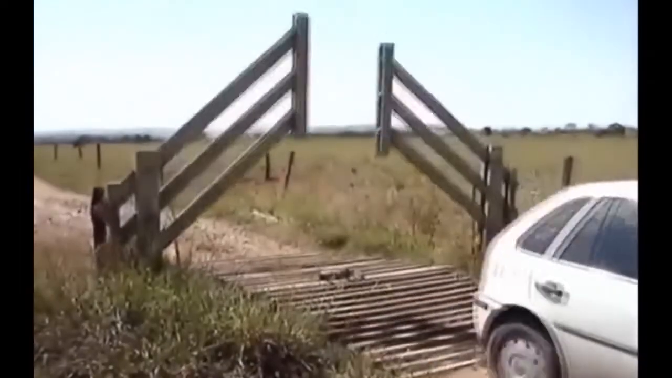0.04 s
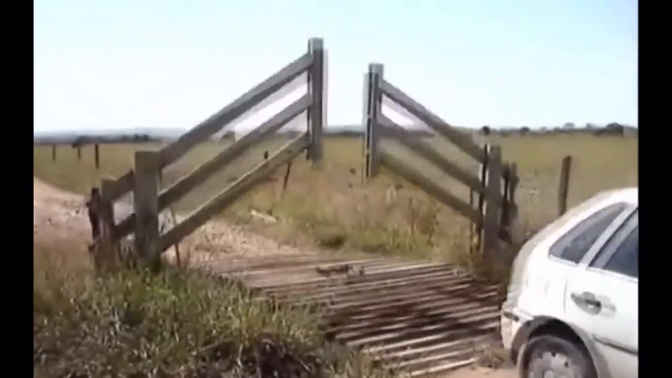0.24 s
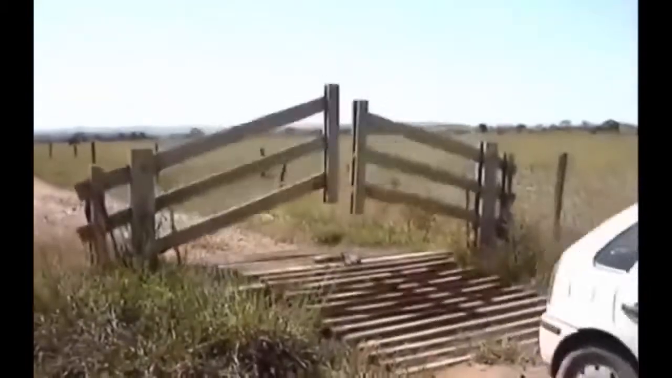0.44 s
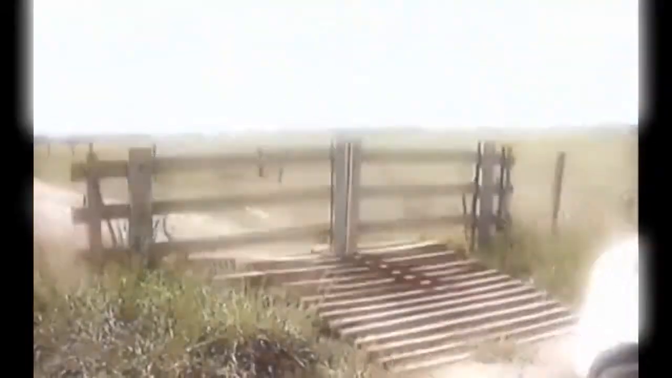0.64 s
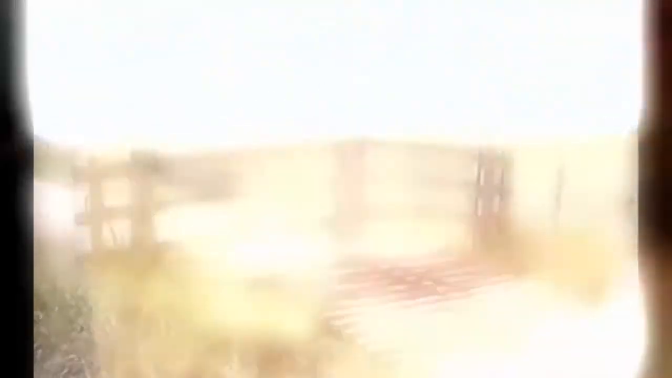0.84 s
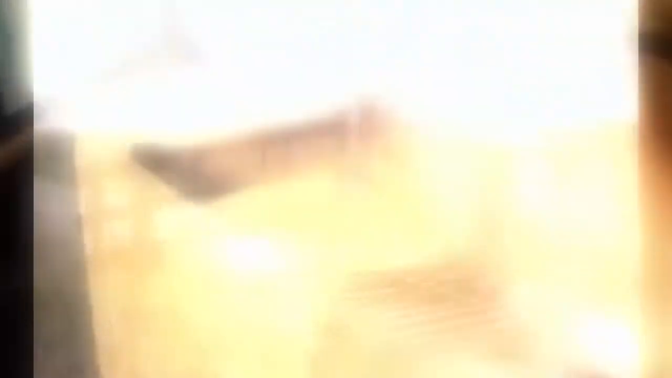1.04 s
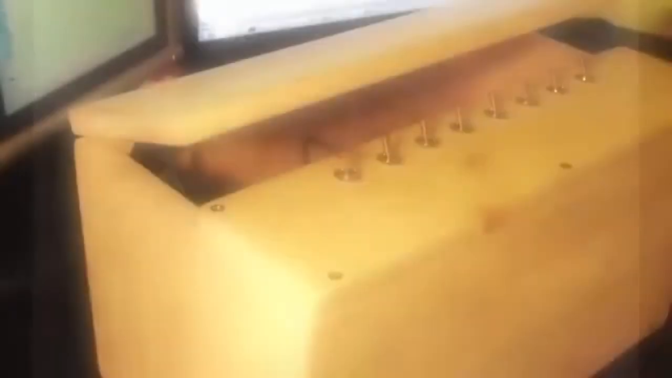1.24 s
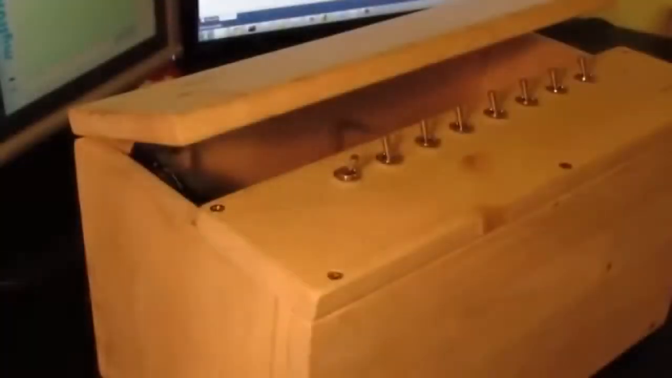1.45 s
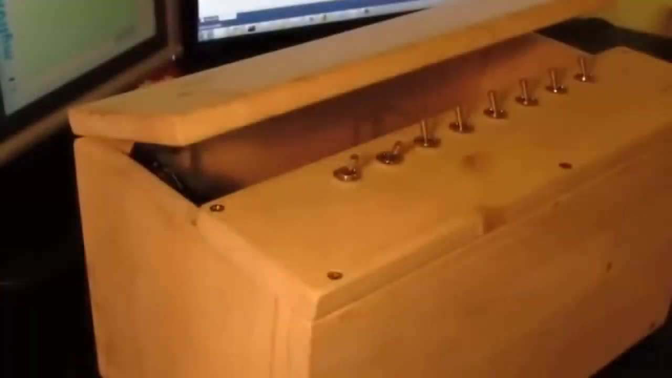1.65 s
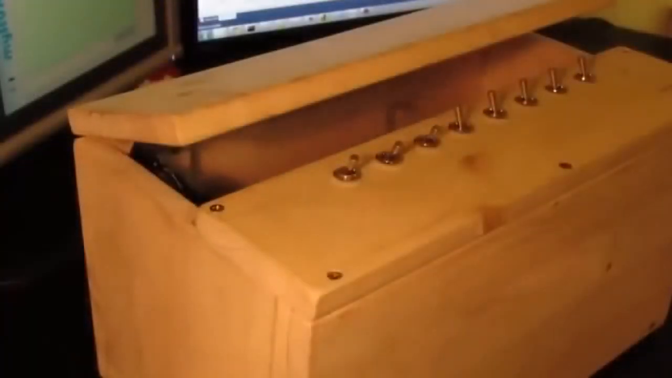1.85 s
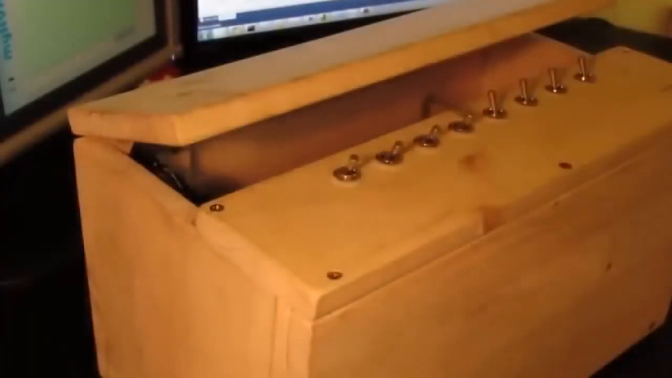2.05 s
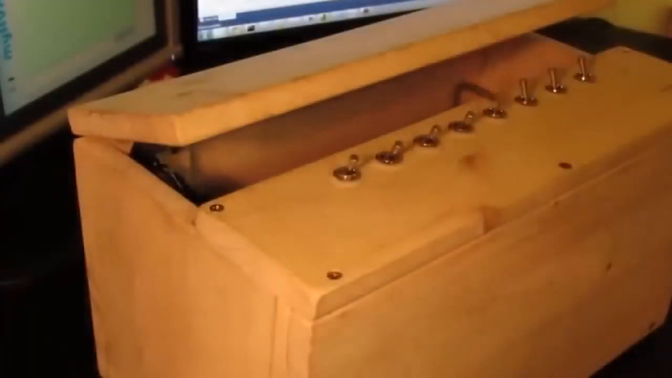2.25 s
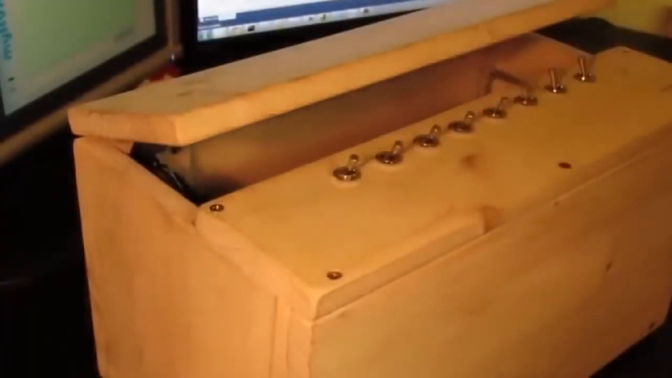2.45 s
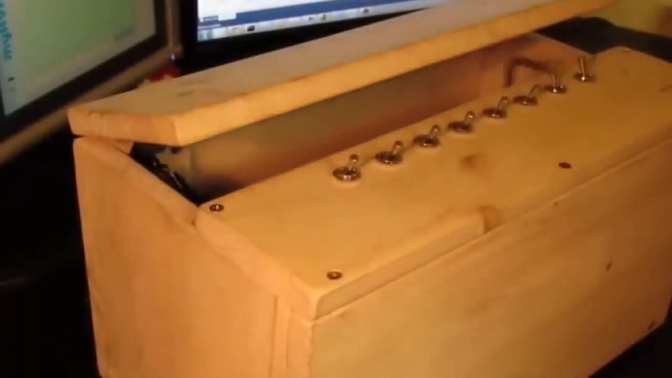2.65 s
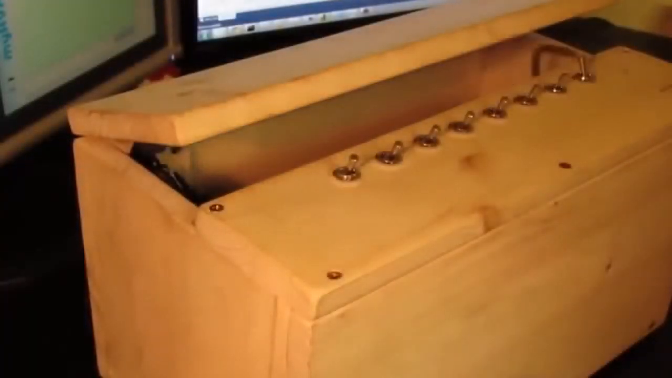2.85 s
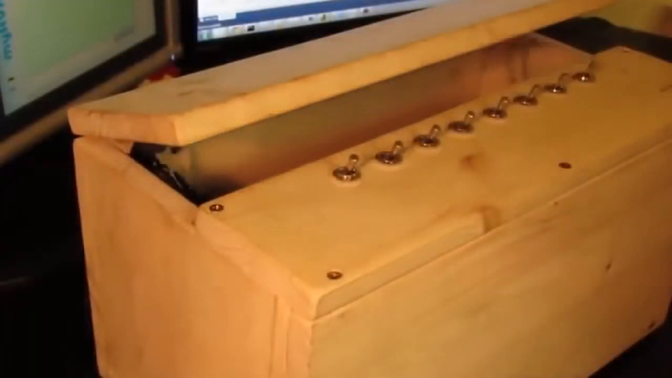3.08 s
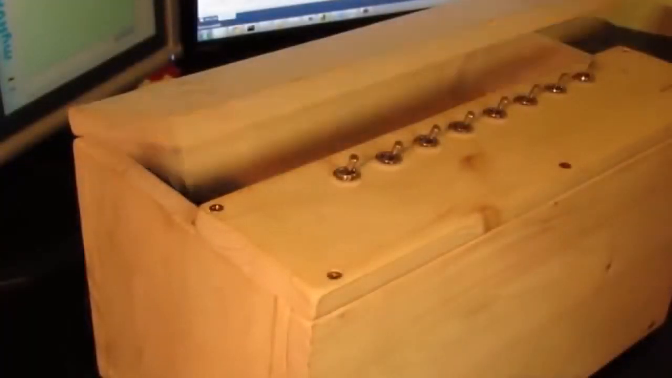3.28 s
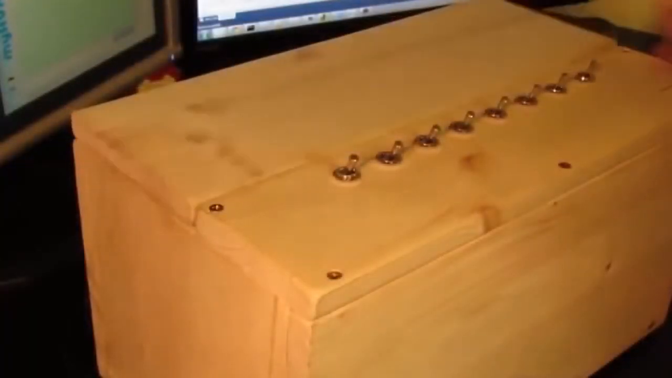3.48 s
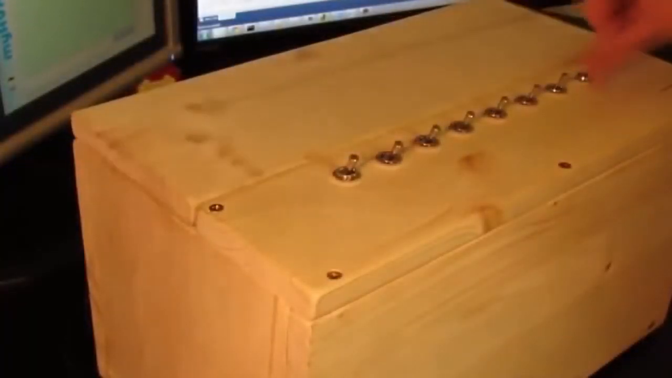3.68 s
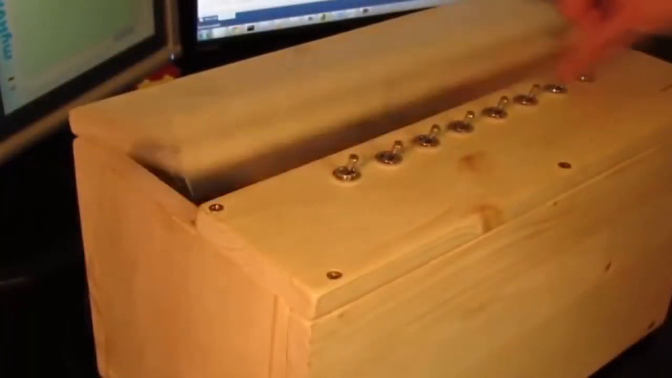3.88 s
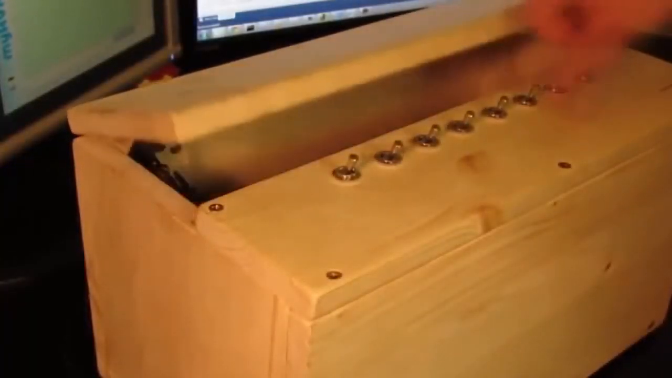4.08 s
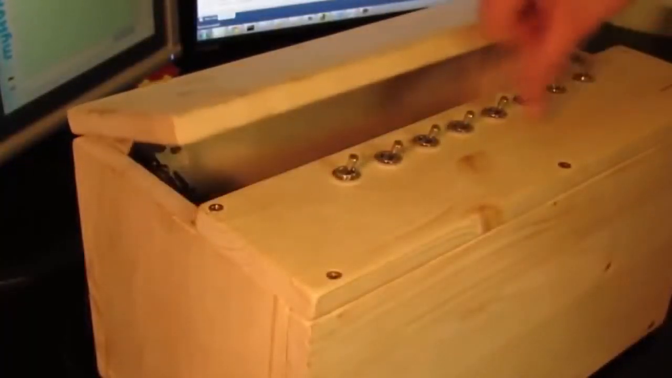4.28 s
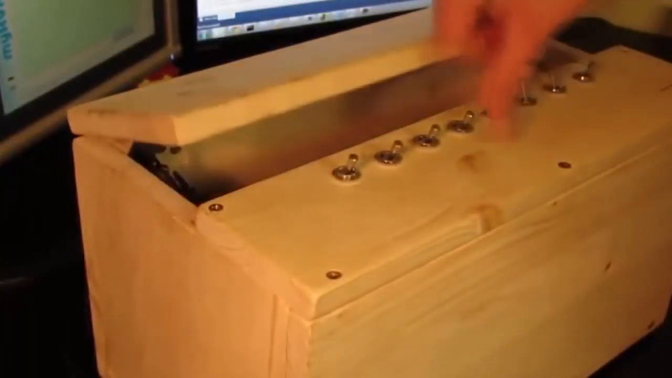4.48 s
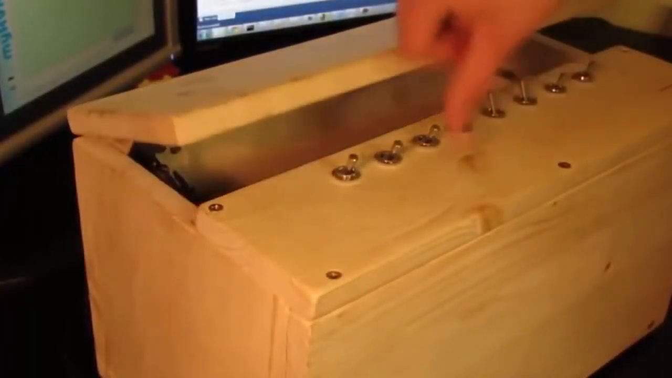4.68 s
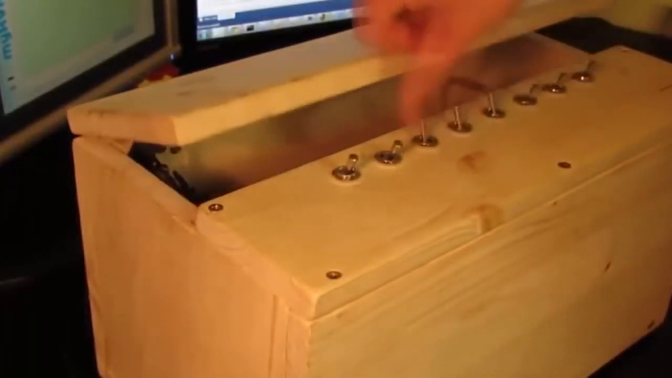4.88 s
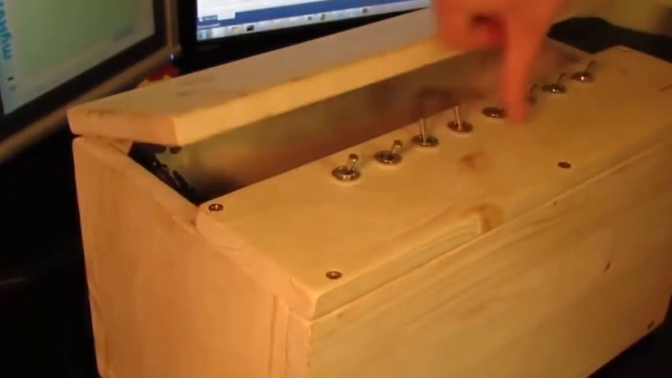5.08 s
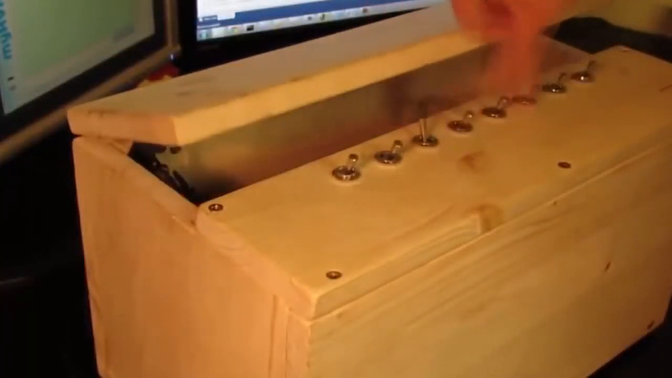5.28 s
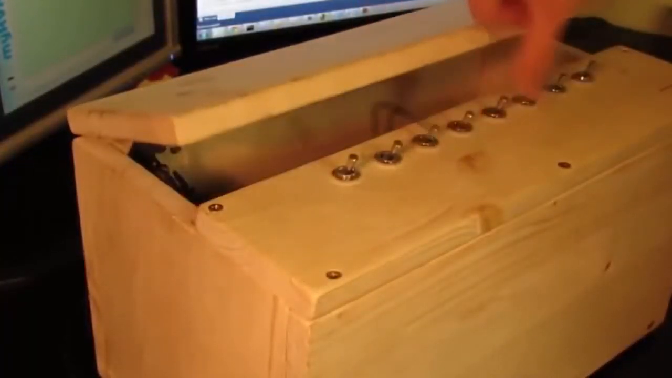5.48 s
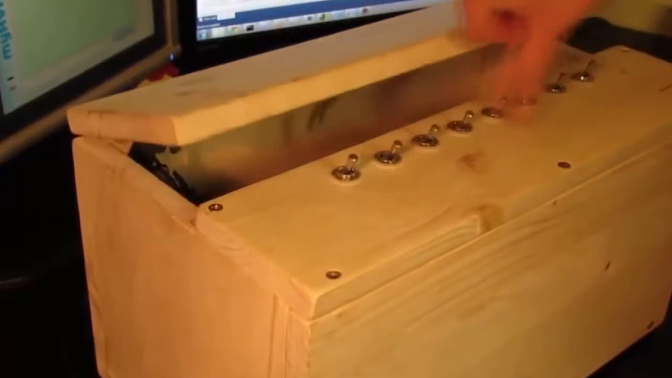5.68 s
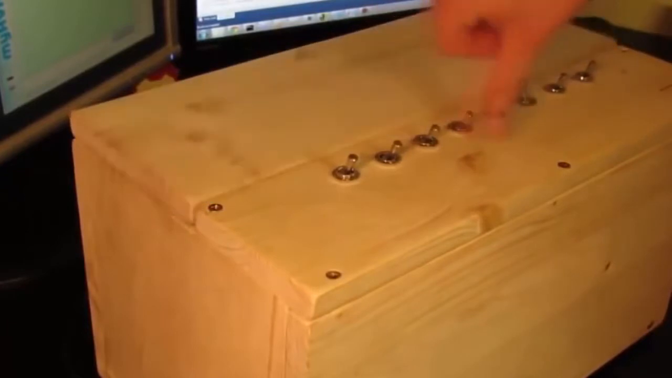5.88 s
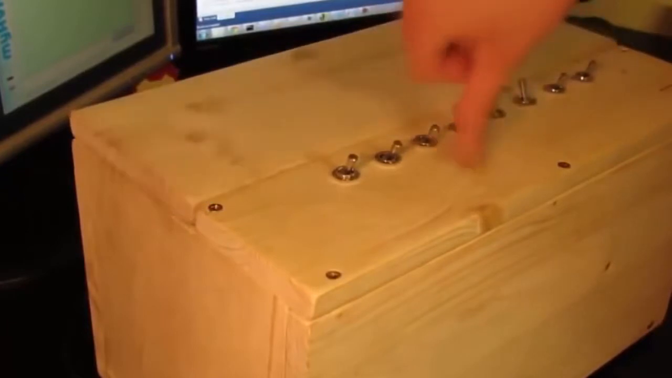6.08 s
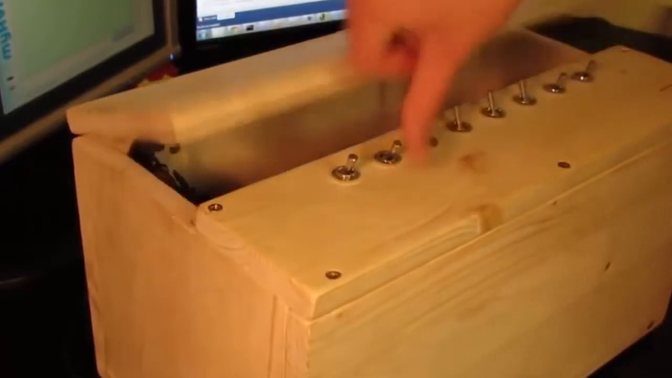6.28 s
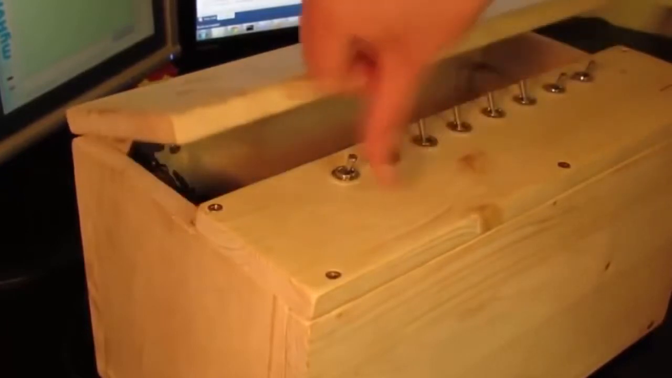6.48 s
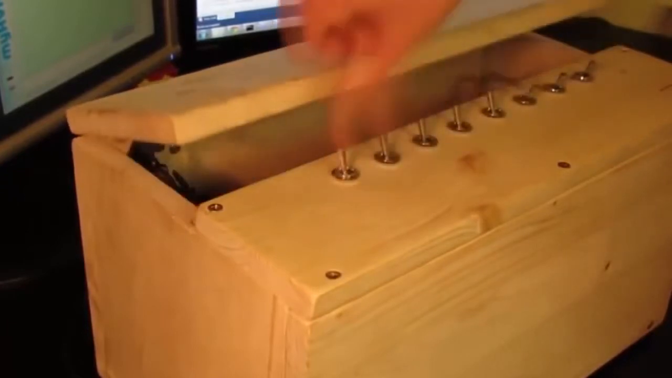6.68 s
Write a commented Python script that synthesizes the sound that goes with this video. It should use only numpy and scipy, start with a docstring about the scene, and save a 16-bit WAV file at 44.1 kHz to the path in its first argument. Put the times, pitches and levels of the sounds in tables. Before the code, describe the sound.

Close up in a small quiet room, toggle switches on a wooden box snap brightly, each ringing the panel. Eight regular snaps come over a gritty motor whir with light rattling and soft arm taps between them. The lid slams with a woody boom; after a short pause the motor restarts and clicks crowd together irregularly. Another lid slam interrupts, then snapping and whirring resume until the end.

```python
"""Metal toggles snap one after another in a small room, each ringing the wooden box they sit in on a desk.
A finger flips them on; a motor-driven arm travels inside the box, whirring and ticking, and flips them back.
Twice the lid claps shut and the box thuds. Springs, wood and box are noise and blows rung through resonances;
motor, gears and rolling carriage are swelling coloured noise. Walls, a near surface and quiet air surround it,
in stereo."""
import sys
import numpy as np
from scipy import signal
from scipy.fft import rfft, irfft, next_fast_len
from scipy.io import wavfile
from scipy.ndimage import map_coordinates

SR = 44100
rng = np.random.default_rng(int(sys.argv[2]) if len(sys.argv) > 2 else 0)


def inscribe(sig):
    """Save sig as 16-bit PCM at rate SR to the path in sys.argv[1].

    A 1-D sig is mono; a 2-D sig holds one channel per row.
    Samples are clipped to [-1, 1] before scaling.
    """
    pcm = np.round(np.clip(np.atleast_2d(sig).T, -1, 1) * 32767)
    wavfile.write(sys.argv[1], SR, pcm.astype(np.int16))


N = 296793  # samples


def amp(db):
    """Decibels to gain."""
    return 10 ** (np.asarray(db) / 20)


def unit(x):
    """Scaled to rms 1."""
    return x / np.sqrt(np.mean(x ** 2) + 1e-20)


def along(points, hz):
    """(Hz, value) points read on a log axis."""
    f, v = np.transpose(points)
    return np.interp(np.log(hz + 1), np.log(f + 1), v)


def filtered(x, response):
    """x times a complex response of frequency, padded so that ringing does not wrap round."""
    n = x.shape[-1]
    padded = next_fast_len(n + 8192)
    return irfft(rfft(x, padded) * response(np.fft.rfftfreq(padded, 1 / SR)), padded)[..., :n]


def resonances(modes, f):
    """Causal response of (Hz, width, dB) modes, alternating in sign."""
    total = 0
    for k, (centre, width, db) in enumerate(modes):
        total = total + (-1) ** k * amp(db) * 1j * f * width / (centre * centre - f * f + 1j * f * width)
    return total


def pair(n, side):
    """Stereo white noise with a given side share."""
    mid, wide = rng.standard_normal((2, n))
    return np.array([mid + side * wide, mid - side * wide])


def rush(spectrum, side):
    """Coloured stereo noise of rms 1."""
    return unit(filtered(pair(N, side), lambda f: amp(along(spectrum, f))))


def wobble(rate):
    """A smooth random curve, rate knots a second."""
    knots = rng.standard_normal(int(N * rate / SR) + 4)
    return map_coordinates(knots, [np.arange(N) * rate / SR])


def add(track, s, sound):
    """Mix a sound into the track at time s."""
    part = track[:, max(round(s * SR), 0):]
    part[:, :sound.shape[-1]] += sound[..., :part.shape[-1]]


def spells(rows, rise_s, fall_s):
    """Gain over time of (start, end, dB) spells: a rise, a hold and an exponential fall."""
    t = np.arange(N) / SR
    gains = []
    for start, end, db in rows:
        rise = np.clip((t - start) / rise_s, 0, 1)
        fall = np.exp(-np.clip((t - end) / fall_s, 0, 20))
        gains.append(amp(db) * rise * fall)
    return np.max(gains, axis=0)


# Quiet air of the room, its colour only. Each row: frequency in Hz, relative level in dB.
AIR = [(15, -39.5), (25, -33), (139, -3), (231, -12.5), (373, -23.5), (450, -18), (903, -25), (1090, -18.5),
       (1960, -24), (8320, -47), (15000, -65)]


def air():
    """Steady broadband noise, strongest in the low mids, fills the room."""
    return amp(-54.5) * rush(AIR, side=0.51)


# Reflection from a surface close by. Each row: frequency in Hz, gain in dB.
NEAR_WALL = [(300, -23), (1000, -11.5), (2500, -32), (9000, -23)]
NEAR_DELAY_S = .0075


def near_surface(hits):
    """One late, weaker copy of the hits, strongest around 1 kHz."""
    return filtered(hits, lambda f: amp(along(NEAR_WALL, f)) * np.exp(-2j * np.pi * f * NEAR_DELAY_S))


# How long the room rings. Each row: frequency in Hz, time to fall 60 dB in seconds.
ROOM = [(100, 0.29), (260, 0.35), (700, 0.32), (2000, 0.26), (5000, 0.27), (13000, 0.21)]
# How wide the room sounds. Each row: frequency in Hz, side share of the stereo.
SPREAD = [(130, 0.1), (400, 0.38), (2000, 0.78), (12000, 0.98)]


def room(x):
    """Diffuse answer of the walls, wider in the treble; the noise tail is redrawn every third of a second."""
    out, hop = np.zeros((2, N)), SR // 3
    for start in range(0, N, hop):
        hz, t, z = signal.stft(rng.standard_normal((2, SR // 2)), SR, nperseg=256)
        z = z * amp(-60 * t / along(ROOM, hz)[:, None]) * (1 - np.exp(-t / 0.0026))
        spread = np.array([z[0], z[1] * along(SPREAD, hz)[:, None]])
        tail = signal.istft(spread, SR, nperseg=256)[1]
        mid, side = tail / np.linalg.norm(tail[0])
        source = x.mean(0)[None, start:start + hop]
        add(out, start / SR, signal.fftconvolve(source, [mid + side, mid - side], axes=1))
    return out


# Spells in which the box rocks: lurches of the carriage, and the box swaying after the heavy thuds. Each row:
# start in seconds, end in seconds, rumble in relative dB.
RUMBLES = [(1.05, 1.17, -38.5), (2.52, 2.80, -47.5), (3.42, 3.48, -38), (3.56, 3.63, -46),
           (3.88, 3.95, -43), (4.10, 4.24, -37), (5.93, 6.00, -36.5), (6.04, 6.09, -44), (6.19, 6.24, -47),
           (6.40, 6.48, -38)]
RUMBLE_RISE_S, SETTLE_S = 0.025, 0.055  # rise time and dying time constant
ROLL_DB = -13  # rumble of the rolling carriage, relative to the motor gain
IDLE_DB = -61.5  # steady rumble of the box, added to the rolling


def carriage(motor_gain):
    """The moving carriage or a heavy thud rocks the box at its lowest resonance and bumps the hollow above it."""
    t = np.arange(N) / SR
    rolling = amp(ROLL_DB) * motor_gain + amp(IDLE_DB)
    rocking = np.maximum(spells(RUMBLES, RUMBLE_RISE_S, SETTLE_S), rolling)
    sway = np.sqrt(2) * np.sin(2 * np.pi * 64.5 * t + 2.0 * wobble(14))

    def low_box(f):
        return resonances([(61.0, 20, 0)], f) * resonances([(66, 300, 0)], f)

    def hollow(f):
        return resonances([(144.0, 29, -2.5), (222, 28, -6.5), (322, 99, -8.5)], f) / (1 + (f / 500) ** 4)

    rumble = unit(filtered(pair(N, side=0.24), low_box))
    bumps = unit(filtered(pair(N, side=0.14) * amp(2.3 * wobble(45)), hollow))
    return rocking * (0.68 * sway + .5 * rumble + 0.36 * bumps) * amp([[.9], [-.9]])  # leans left


# Runs of the drive: lifting the lid, working along the row, withdrawing, racing to the far end, chasing
# the finger. Each row: start in seconds, end in seconds, motor in relative dB, gear hiss in relative dB.
RUNS = [(0.957, 1.406, -58.5, -50), (1.406, 3.118, -47.5, -42.5), (3.13, 3.467, -60.5, -44),
        (3.845, 3.92, -48, -54), (4.003, 4.287, -45.5, -42), (4.383, 5.653, -50.5, -49.5),
        (5.65, 5.856, -66, -48.5), (6, 6.22, -55, -52), (6.347, 6.509, -44.5, -40.5)]
SPIN_UP_S, RUN_DOWN_S = 0.019, 0.038  # rise time and dying time constant
# The motor eases off as the arm meets a toggle: depth, delay after the touch, half width.
EASE_DB, EASE_LAG_S, EASE_S = 1.5, 0.059, 0.023


def effort():
    """Gains of motor and gears as the drive starts and stops; the motor also eases off at each toggle."""
    t = np.arange(N) / SR
    easing = sum(np.exp(-((t - s - EASE_LAG_S) / EASE_S) ** 2) for s, *_ in STROKES)
    motor = spells([(start, end, db) for start, end, db, _ in RUNS], SPIN_UP_S, RUN_DOWN_S)
    gears = spells([(start, end, db) for start, end, _, db in RUNS], SPIN_UP_S, RUN_DOWN_S)
    return motor * amp(-EASE_DB * easing), gears


# Low resonances of the hollow box. Each row: frequency in Hz, width in Hz, relative level in dB.
HOLLOW = [(151.2, 4.1, 3), (177, 11, -4.5), (229, 31, -2.5), (397, 35, -9.5)]
# Colour of the motor's whir. Each row: frequency in Hz, relative level in dB.
WHIR = [(59, -32), (100, -13), (129, -7.5), (242, -2.5), (312, -15.5), (386, -3), (472, -4.5), (713, -12),
        (799, -9), (975, -5.5), (1110, -8), (1880, -10.5), (2040, -42), (2260, -18), (3000, -15.5),
        (3900, -26), (6600, -120)]
# Colour of the gear hiss. Each row: frequency in Hz, relative level in dB.
GEARS = [(1180, -37.5), (2000, -2.5), (2460, -2), (3100, -7), (6580, -5.5), (9930, -17.5), (10900, -14.5),
         (13500, -28.5), (14200, -28.5), (15500, -67)]
# Ringing gear parts. Each row: frequency in Hz, width in Hz, relative level in dB.
WHINE = [(2950, 380, 0.5), (4860, 90, 4), (6280, 60, -9), (6950, 54, 2), (7800, 60, -2.5), (8960, 60, -1),
         (10600, 71, -3.5)]
SCRAPE_DB, SCRAPE_PER_S = 2, 70  # unevenness of the gear sound: depth and knots a second


def drive(motor_gain, gear_gain):
    """The motor whirs in the hollow box; the gears hiss and sing; whir and gears swell once a turn."""
    t = np.arange(N) / SR
    hollow = unit(filtered(pair(N, side=0.096), lambda f: resonances(HOLLOW, f)))
    turn = np.sin(2 * np.pi * 22 * t + wobble(10.0))  # about 22 turns a second
    whir = amp(-1.0 + 3.9 * turn + 0.9 * wobble(91)) * rush(WHIR, side=0.46)
    motor = whir + amp(-2.0) * hollow
    whine = unit(filtered(pair(N, side=0.26), lambda f: resonances(WHINE, f)))
    swell = amp(-12.0 + 2.1 * turn + SCRAPE_DB * wobble(SCRAPE_PER_S))
    gears = swell * (rush(GEARS, side=0.62) + 0.61 * whine)
    return motor_gain * motor + gear_gain * gears


# The wooden switch panel. Each row: frequency in Hz, width in Hz, relative level in dB.
PANEL = [(195, 87, -2), (437.5, 82, 2), (639.4, 62, 1.5), (933, 267, -3), (1030, 113, 2), (1264, 59, -4),
         (1410, 67, -7.5), (1705, 49, -14), (1839, 64, -3.5), (1903, 336, -1.5), (2120, 160, 0),
         (2430, 213, -4), (2822, 300, 2), (2990, 300, -5.5), (3250, 650, -15.5), (4120, 1800, 3),
         (6500, 2310, 10), (6560, 45, -18), (8170, 670, 1), (11100, 7100, -5.5)]


def rattle(motor_gain):
    """Loose linkage taps the wood dully at random, harder while the motor works."""
    t = np.arange(SR // 100) / SR
    taps = (rng.random(N) < 55 / SR) * amp(12 * rng.uniform(-1.4, 1, N))  # about 55 a second
    tap = pair(SR // 100, side=0.71) * np.exp(-t / 0.0013)
    excite = signal.fftconvolve(taps[None], tap, axes=1)[:, :N]
    wood = unit(filtered(excite, lambda f: resonances(PANEL, f) / (1 + (f / 3200) ** 4)))
    return amp(-4.0) * motor_gain * wood


def spot(modes, scatter_db):
    """Each place on a board favours other modes."""
    return [(hz, width, db + scatter_db * rng.standard_normal()) for hz, width, db in modes]


# Bands of a contact, low to treble. Each row: low edge in Hz, high edge in Hz, chatter rise in seconds and
# chatter time to fall 60 dB in seconds (both at length 1), side share of the stereo.
BANDS = [(173, 620, 0.00065, 0.1, 0.4), (814, 1634, 0.0035, 0.044, 0.36), (1710, 3320, 0.0007, 0.066, 0.39),
         (3650, 16700, 0.000096, 0.052, 0.6)]
GRID = np.fft.rfftfreq(8192, 1 / SR)  # Hz
OCTAVES = np.log2([np.sqrt(lo * hi) / 2000 for lo, hi, *_ in BANDS])  # band centres from 2 kHz


def band_edges(lo, hi):
    """Complex response of one band on the frequency grid."""
    sos = signal.butter(3, [lo, hi], "band", fs=SR, output="sos")
    return signal.sosfreqz(sos, GRID, fs=SR)[1]


EDGES = np.array([band_edges(lo, hi) for lo, hi, *_ in BANDS])


def body(modes):
    """A wooden part's response, split into the bands of a contact."""
    return resonances(modes, GRID) * EDGES


def contact(wood, levels, length, crack, slide_db, size=8192):
    """A rising slide, one sharp blow and dying chatter excite the wood; the blow falls 10 ms in."""
    lead = SR // 100
    t = (np.arange(size) - lead) / SR
    after = np.maximum(t, 0)
    slide = amp(slide_db) * np.exp(-np.abs(t) / (0.003 * length)) * (t < 0)
    blow = crack * (t == 0)
    sound = np.zeros((2, size))
    for response, db, (_, _, rise, t60, side) in zip(wood, levels, BANDS):
        chatter = (1 - np.exp(-after / (rise * length))) * amp(-60 * after / (t60 * length))
        ring = irfft(rfft((chatter + slide) * pair(size, side) + blow) * response)
        loudness = np.sqrt(np.mean(ring[:, lead:3 * lead] ** 2))  # first 20 ms from the blow
        sound += amp(db) * ring / loudness
    return sound


# The arm landing, rebounding or jolting the box. Each row: start in seconds, boom and knock in relative dB.
THUDS = [(1.082, -35.5, -58), (1.14, -42, -75), (1.22, -42, -78), (3.451, -13.5, -41.5),
         (3.5006, -25, -45.5), (3.895, -34, -51.5), (5.946, -13.5, -35.5), (5.9964, -26, -43),
         (6.205, -36.5, -57), (6.274, -29, -60), (6.348, -57, -43)]
# The box on the desk. Each row: frequency in Hz, relative level in dB, time to fall 60 dB in seconds.
BOOM = [(66, -30, 0.47), (139.1, -1, 0.19), (172.5, -6.5, 0.31), (233, -6, 0.11), (378.5, -2, 0.077)]
# The wooden lid. Each row: frequency in Hz, width in Hz, relative level in dB.
LID = [(418, 360, -10.5), (604, 57, 5.5), (993, 90.5, 14), (1243, 139, 11), (1426, 23, 10.5),
       (1599, 113, 0.5), (1820, 179, -2.5), (2255, 224, -12), (2695, 210, -14), (3950, 1300, -29),
       (5870, 2100, -32), (10800, 5000, -41)]


def thuds():
    """The arm's weight sets the whole box booming, with a dull knock on top."""
    out, wood, t = np.zeros((2, N)), body(LID), np.arange(SR // 2) / SR
    for s, boom_db, knock_db in THUDS:
        ring = sum(amp(db - 60 * t / t60) * np.sin(2 * np.pi * hz * t) for hz, db, t60 in BOOM)
        add(out, s, amp(boom_db + 0.5) * ring * (1 - np.exp(-t / 0.0039)))
        levels = knock_db + np.array([1.5, 2.5, 3, -9.5])
        add(out, s - 1 / 100, contact(wood, levels, length=1.02, crack=0.55, slide_db=-2))
    return out * amp([[.6], [-.6]])  # leans left


# The lid falling shut and bouncing. Each row: start in seconds, relative level in dB.
CLAPS = [(3.3964, -24), (3.4036, -27), (5.892, -26.5), (5.900, -29)]
# Colour of a clap: the low, mid, bright and treble bands, each in dB.
CLAP_COLOUR = (-6, -2, 2.5, -2)


def lid():
    """The lid's edge claps on the panel and rings the lid's own wood."""
    out, wood = np.zeros((2, N)), body(LID)
    for s, db in CLAPS:
        levels = db + np.array(CLAP_COLOUR)
        add(out, s - 1 / 100, contact(wood, levels, length=0.6, crack=6.3, slide_db=-5.5))
    return out * amp(4.0)


# Strokes of the arm, which touches a toggle, throws it and drops back.
# Each row: touch in seconds, touch level in relative dB, landing level in relative dB.
STROKES = [(1.324, -43, -37.5), (1.592, -36.5, -35.5), (1.805, -36.5, -34), (2.047, -39, -35.5),
           (2.275, -42, -34), (2.51, -40.5, -30.5), (2.726, -34, -36.5), (2.983, -36, -62),
           (4.338, -40.5, -50), (4.566, -39.5, -48), (4.805, -41.5, -41), (5.02, -42, -43),
           (5.256, -38, -41.5), (5.474, -38.5, -46)]
# Colours of a touch and a landing: the low, mid, bright and treble bands, each in dB.
TOUCH_COLOUR = (-3, -1, 0, 1)
LANDING_COLOUR = (-1.5, -0.5, -6.5, -11)
RETURN_S = .131  # from the snap until the arm lands on its rest


def arm_contacts():
    """(s, band levels) of each stroke: a bright touch, then a dull landing a fixed time after the toggle snaps."""
    contacts = []
    for s, touch_db, landing_db in STROKES:
        snap_s = min(row[0] for row in SNAPS if row[0] > s)
        contacts.append((s, touch_db + np.array(TOUCH_COLOUR)))
        contacts.append((snap_s + RETURN_S, landing_db + np.array(LANDING_COLOUR)))
    return contacts


# Stray knocks of lid, linkage and finger.
# Each row: start in seconds, relative level in dB, tilt in dB per octave.
KNOCKS = [(0.634, -54, -1.5), (0.984, -40.5, -1.3), (1.058, -46, 0), (1.12, -49, 2.5), (1.167, -55.5, 2),
          (1.283, -40.5, 3.5), (1.826, -42, -3), (3.36, -43, 0.5), (3.377, -44, -2.5), (3.77, -50, 1.5),
          (3.985, -44.5, 6.5), (4.032, -33, -0.5), (4.112, -44.5, 1), (4.205, -39, 2.5), (5.316, -32, 0),
          (6.159, -46, -3), (6.248, -51, 9), (6.341, -34, -0.5), (6.647, -46.5, 7.5)]
# Colour of a knock: the low, mid, bright and treble bands, each in dB.
KNOCK_COLOUR = (-1.5, 3.5, -2, -9)


def ticks():
    """Softer, longer scuffs as the arm, the lid or the finger meets toggle and wood."""
    out = np.zeros((2, N))
    stray = [(s, db + np.array(KNOCK_COLOUR) + tilt * OCTAVES) for s, db, tilt in KNOCKS]
    for s, levels in arm_contacts() + stray:
        wood = body(spot(PANEL, scatter_db=3.0))
        add(out, s - 1 / 100, contact(wood, levels, length=1.22, crack=4.4, slide_db=-12.5))
    return filtered(out, lambda f: amp(-1.5) / (1 + (f / 12500) ** 4))  # the very top is rolled off


def ping(hz, t60):
    """The steel contact's own very short ring, with a bright click on its front."""
    t = np.arange(SR // 50) / SR
    bright = signal.butter(2, [2500, 8500], "band", fs=SR, output="sos")
    click = signal.sosfilt(bright, pair(len(t), side=0.43) * np.exp(-t / 0.00063))
    ring = np.sin(2 * np.pi * hz * t) * amp(-60 * t / t60) * (1 - np.exp(-t / 0.00015))
    return ring + 1.2 * click


# Toggles snapping over. Each row: start in seconds, relative level in dB, tilt in dB per octave,
# chatter length (1 = usual), panel ring in Hz, ring boost in dB, steel ping in Hz.
SNAPS = [(0.7893, -35, 0.7, 1.07, 2390, 3, 5600), (0.796, -35, 2, 1.1, 1410, 6.5, 5400),
         (0.812, -34, 1.7, 1, 2740, 1, 4130), (1.4126, -25.5, 0, 0.83, 2860, 3.5, 6280),
         (1.655, -26, 0.3, 1.02, 2490, 1, 4780), (1.8723, -25.5, -0.8, 0.77, 2600, 4, 6160),
         (2.1055, -26.5, -0.5, 0.59, 1830, 5.5, 5680), (2.343, -25.5, 0.6, 0.98, 2230, 4, 6840),
         (2.5633, -24, 0.5, 1.08, 2130, -0.5, 4150), (2.8047, -23.5, -0.5, 0.9, 2960, 2.5, 4070),
         (3.0414, -25, .5, 1.09, 1200, 2.5, 3960), (3.8014, -27.5, 0, 0.87, 1300, 5, 7000),
         (4.004, -26.5, -0.1, 0.78, 1250, 4, 4130), (4.2299, -24, -0.4, 1.04, 947, 2, 3700),
         (4.418, -26, 0.1, 1.2, 1240, 0.5, 6050), (4.4652, -24, -1.1, 0.85, 1270, -3, 6640),
         (4.652, -26, -1, 0.83, 1220, 1.5, 7400), (4.6791, -29, 1.5, 1.1, 930, 2.5, 7300),
         (4.863, -29.5, 0, .84, 2100, 5, 6030), (4.899, -26, 0.4, 1.04, 1030, -2, 4480),
         (5.0896, -28, 0, 0.96, 2160, 5, 5570), (5.3236, -28.5, 0.8, 0.86, 960, 3, 6700),
         (5.538, -27, -0.5, 0.92, 1230, 2.5, 6250), (5.6129, -26.5, -1, 0.8, 2100, -0.5, 7050),
         (5.8231, -24.5, -0.5, 1.16, 1244, -4, 5870), (6.0426, -29.5, -.1, 1.09, 2420, 0.5, 3880),
         (6.268, -28.5, 0.5, 0.81, 1210, 1, 6700), (6.4806, -31.5, 2.2, 0.86, 1240, 4, 6630),
         (6.703, -29, 1.5, 0.86, 1210, 4.5, 6000), (6.7265, -29, 0, 1.5, 1500, 7, 6400)]
# Colour of a snap: the low, mid, bright and treble bands, each in dB.
SNAP_COLOUR = (-6, -0.5, 0, -1.5)
RING_OCTAVES = 0.89  # reach of a toggle's favoured ring into the nearby bands


def switches():
    """Each toggle's spring throws its contact over and shakes the panel; short chatter pings hardest."""
    out = np.zeros((2, N))
    for s, db, tilt, length, ring_hz, ring_db, ping_hz in SNAPS:
        apart = OCTAVES - np.log2(ring_hz / 2000)
        favoured = ring_db * np.exp(-(apart / RING_OCTAVES) ** 2)
        levels = db + np.array(SNAP_COLOUR) + tilt * OCTAVES + favoured
        wood = body(spot(PANEL, scatter_db=2.74) + [(ring_hz, 150, 3)])
        add(out, s - 1 / 100, contact(wood, levels, length, crack=2.9, slide_db=-11.0))
        add(out, s, amp(levels[-1] + 11.5) / length ** 2.5 * ping(ping_hz, t60=0.0088))
    return out * amp(0.5)


def scene():
    """The box, its reflection from a near surface, the room and its quiet air."""
    motor_gain, gear_gain = effort()
    snaps, claps, booms = switches(), lid(), thuds()
    knocks = ticks() + rattle(motor_gain)
    hits = snaps + knocks + claps
    walls = room(amp(-10.5) * snaps + amp(-9.0) * knocks + amp(-10.5) * claps + amp(-6.5) * booms)
    machine = carriage(motor_gain) + amp(1.5) * drive(motor_gain, gear_gain)
    return amp(-0.95) * (hits + near_surface(hits)) + booms + walls + machine + air()


START_S, TOP_HZ = .63, 15900  # the sound begins; the band limit


def record(dry):
    """Silence before the start, a short fade in, and a steep cut above the band limit."""
    opened = np.clip((np.arange(N) / SR - START_S) / 0.011, 0, 1)
    return filtered(dry * opened, lambda f: 1 / (1 + (f / TOP_HZ) ** 120))


dry = scene()
out = record(dry)
inscribe(out)
```